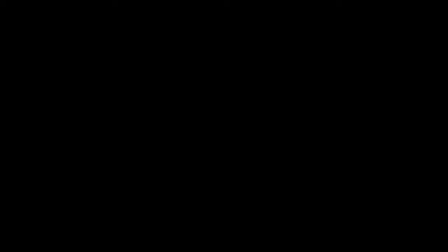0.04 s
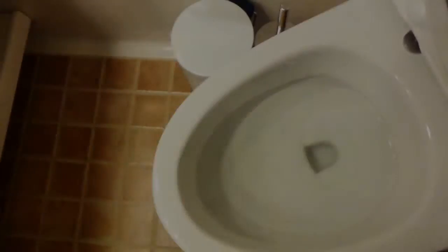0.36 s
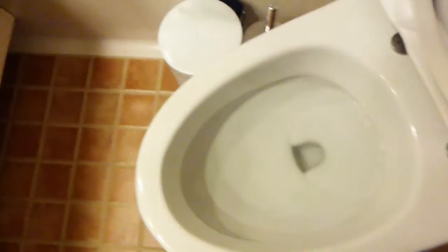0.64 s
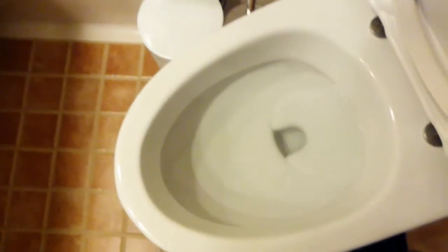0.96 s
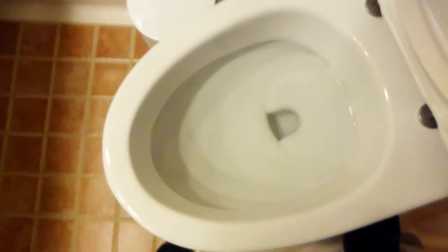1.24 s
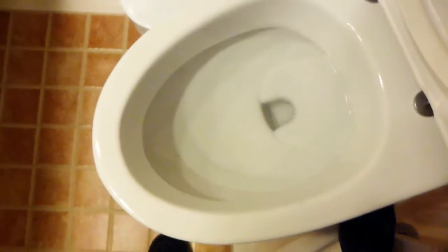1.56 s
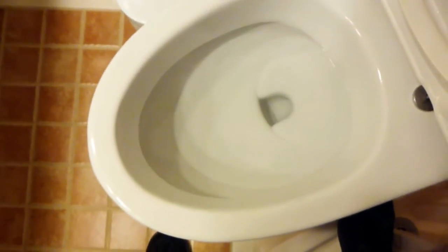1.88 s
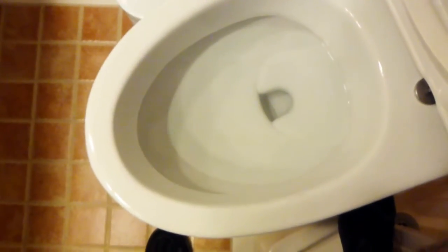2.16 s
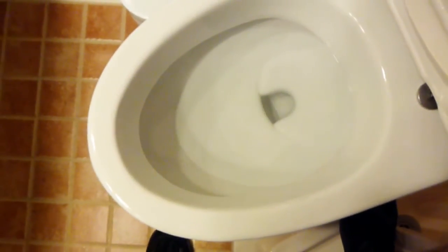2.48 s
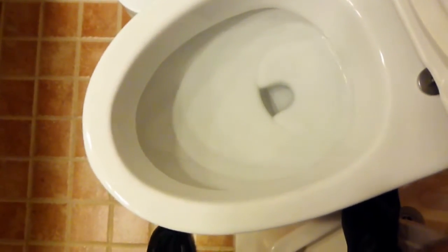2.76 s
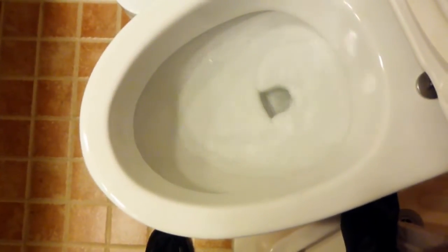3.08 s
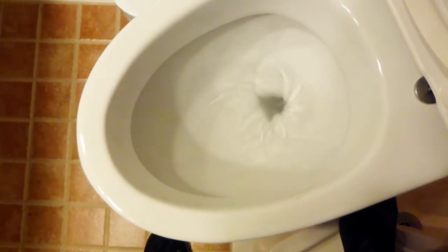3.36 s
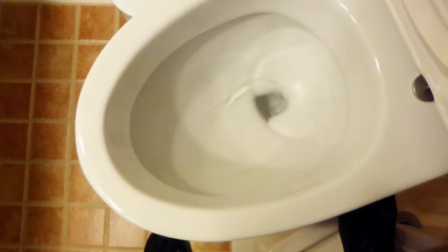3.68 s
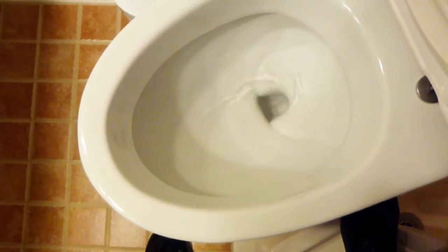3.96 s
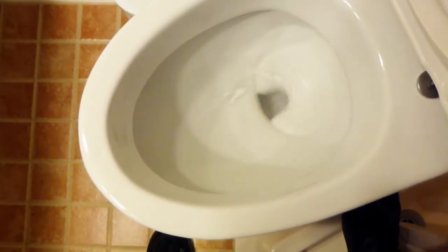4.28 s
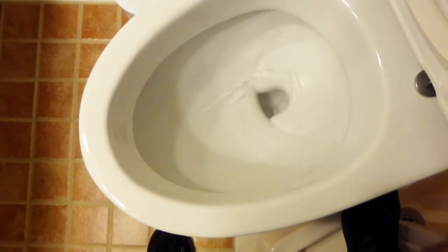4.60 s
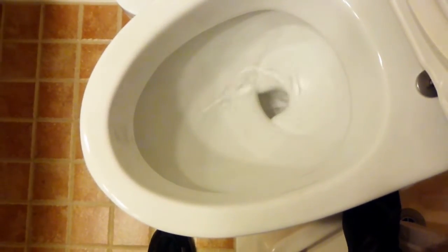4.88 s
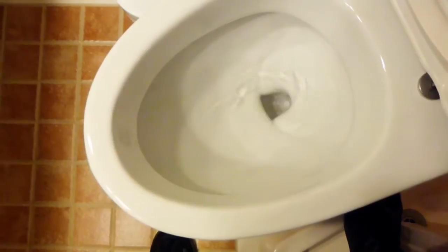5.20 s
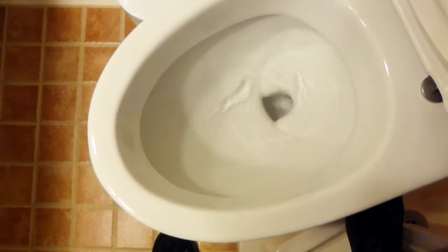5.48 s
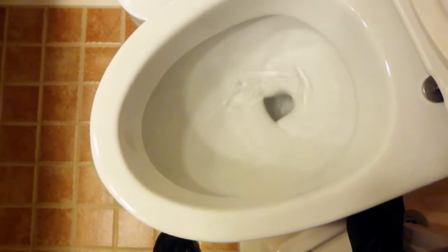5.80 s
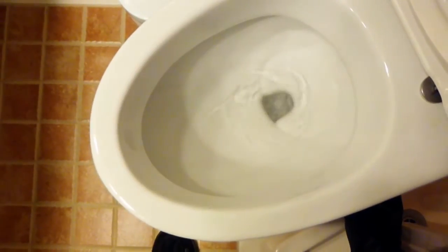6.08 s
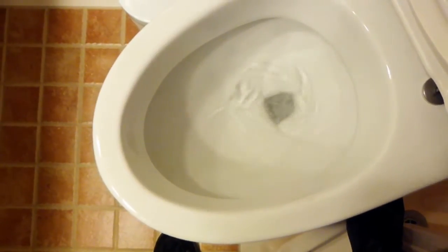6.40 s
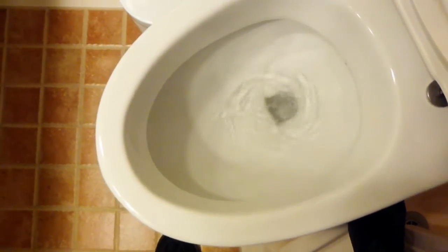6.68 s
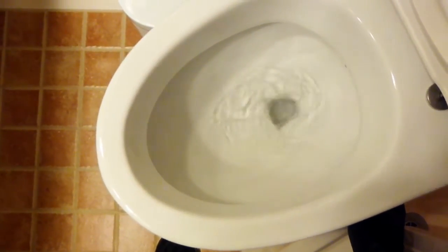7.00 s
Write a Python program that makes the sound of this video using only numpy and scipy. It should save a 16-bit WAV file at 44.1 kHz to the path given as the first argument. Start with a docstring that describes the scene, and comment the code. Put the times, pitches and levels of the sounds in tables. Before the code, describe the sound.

Heard close above the bowl in a cramped cubicle, a vacuum toilet flushes over a low, steady ventilation hum. Soft taps and a button click lead into gurgling, spraying suction, which grows into a loud, droning rush of air. A hard, briefly ringing thump cuts it off. Afterwards, much quieter water patters and trickles back into the bowl with small bubbling drops and sharp spits.

```python
"""Vacuum toilet flush

A vent hums in a small cubicle. The button clicks, the drain valve thuds open, and the water is
slurped out in spitting gulps. Air then roars down the empty pipe until the valve slams shut.
A limiter briefly turns everything down at the slam, and rinse jets patter and drip into the bowl."""
import sys
import numpy as np
from scipy import signal
from scipy.fft import rfft, irfft, next_fast_len
from scipy.io import wavfile
from scipy.ndimage import uniform_filter1d, minimum_filter1d, map_coordinates

SR = 44100
rng = np.random.default_rng(int(sys.argv[2]) if len(sys.argv) > 2 else 0)


def unload_audio(sound):
    """Save the sound as a 16-bit wav file, at the path given as the first command line argument."""
    columns = np.transpose(np.atleast_2d(sound))
    # keep every value between -1 and 1, then stretch to whole-number steps
    steps = np.round(np.clip(columns, -1, 1) * 32767)
    wavfile.write(sys.argv[1], SR, steps.astype(np.int16))


N = 319725
T = np.arange(N) / SR

# The broad tone of each sound, from bass to treble: (frequency [Hz], relative level [dB])
VENT_TONE = [(12, -18), (20, -24), (49, -13), (134, -11.5), (172, -0.5), (277, -16.5), (377, -13.5),
             (410, -18.5), (513, -21), (558, -24.5), (624, -18.5), (698, -23.5), (1370, -26.5),
             (1610, -25.5), (16000, -50)]  # air in the duct
PLASTIC_TONE = [(100, -6), (400, 5.5), (1100, -9), (1600, 1.5), (2100, -4), (3000, -8.5), (5000, -22),
                (10000, -23), (15500, -30)]  # knocks on plastic
PUFF_TONE = [(800, -3.5), (2000, -13), (4500, 3), (6500, -0.5), (9000, -7.5), (15500, -9.5)]  # the button's puff, and mist in the pipe
WASH_TONE = [(40, -16), (100, -21.5), (160, -1.5), (250, -6), (295, -6), (345, 0), (420, -7.5), (520, -17),
             (900, -24.5), (1500, -62), (4000, -31)]  # rinse water drumming on the bowl
JET_TONE = [(500, 2), (1500, -24), (3000, 8), (6000, 5.5), (7600, -1.5), (10000, -7.5), (13000, 4),
            (15500, -0.5)]  # hissing rinse jets
SPIT_TONE = [(1000, -48), (3500, 7), (5500, 3), (7600, 8.5), (10000, 4.5), (15500, -6.5)]  # spitting nozzles
THUD_TONE = [(30, -22), (80, -19.5), (170, 5), (450, 6.5), (1200, 0.5), (3000, -3), (12000, -34)]  # what the bowl lets out of the pipe's ring
SPRAY_TONE = [(40, -13), (120, -6), (350, -3), (700, -12.5), (1500, -17), (2400, -8), (3400, -8),
              (5000, -6.5), (8000, -7.5), (11000, -11), (15500, -17.5)]  # water tearing at the outlet
GULP_TONE = [(80, -23), (300, -5.5), (550, -8), (1100, 1), (2000, -5.5), (3300, 3.5), (4300, 0.5),
             (5300, -4), (7000, -6), (10000, -13.5), (15500, -27)]  # gulps of water and air
DRONE_TONE = [(30, -29), (95, -18), (135, -5), (200, -7), (250, 2.5), (300, 2.5), (335, -18.5), (400, -5),
              (520, -17.5), (900, -41.5)]  # air in the pipe
ROAR_TONE = [(150, -19.5), (450, -17.5), (700, -4), (900, 1.5), (1100, 0.5), (1400, -5.5), (2100, -9),
             (3200, -13.5), (4500, -16.5), (6000, -21), (10000, -23.5), (15500, -35)]  # air in the bowl

# Resonances (pitches that ring) and the dips between them: (frequency [Hz], width [Hz], boost [dB])
DUCT_PEAKS = [(49, 21, 9.5), (123, 4.3, 11), (163.5, 30, 7), (280, 40, -6), (313, 35, 6), (380, 14, 8),
              (518, 14, 7.5), (1583, 9.6, 12)]  # the vent's hum
BUTTON_PEAKS = [(1590, 200, 7), (2210, 290, 8)]  # the button's ring
BOWL_PEAKS = [(163.6, 14, 14.5), (339.8, 33.5, 9), (590.6, 67, 12), (652.6, 25, 7.5), (780, 31, 4),
              (768, 25, -6), (864, 72, 9), (1185, 20, 11), (1295, 75, -6), (1344, 14, 6.5), (1532, 5.9, 11),
              (1590, 99, 0.5), (1720, 35, 6.5), (1984, 39, -13), (1954, 80, 15), (2163, 41, 4),
              (2475, 22, 9.5), (2580, 70, -1.5), (2821, 46, 8.5), (3066, 34, 10), (3330, 19, 1.5),
              (3880, 17, 4), (4740, 10, -2)]  # the bowl and cubicle
EMPTY_BOWL_PEAKS = [(555, 25, -5), (845, 40, 3), (1270, 70, -5), (1438, 20, 4), (1567, 30, 4),
                    (1737, 28, 4), (2030, 90, -4), (2403, 24, 4), (2630, 60, -4), (3337, 18, 5),
                    (4813, 22, 6)]  # the sharper ring that an empty bowl adds

# The cubicle's echo: (frequency [Hz], time to fade by 60 dB [s])
ECHO_TIMES = [(150, 0.022), (1000, 0.058), (4000, 0.07), (12000, 0.22)]
# How much of the echo differs between the ears: (frequency [Hz], level [dB])
STEREO_WIDTH = [(50, -23), (90, -27), (170, -36), (400, -30), (1200, -25), (3500, -19.5), (10000, -16)]
# Light knocks and the button: (time [s], relative level [dB], fade time [s], tilt [dB per octave])
BUTTON_KNOCKS = [(1.8, -37.5, 0.012, -6), (2.254, -28, 0.012, -10), (2.777, -31, 0.012, -7),
                 (2.846, -35.5, 0.025, -1), (2.88, -25, 0.015, 2.5), (2.904, -33, 0.073, -15.5)]
# The stronger spits from the rinse nozzles: (time [s], relative level [dB])
STRONG_SPITS = [(5.714, -25), (5.902, -34), (6.062, -28), (6.106, -30), (6.345, -31), (6.404, -31),
                (6.494, -24), (6.621, -25), (6.71, -28.5), (6.779, -26), (6.905, -28.5), (6.995, -24),
                (7.008, -13.5), (7.232, -25.5)]
# Large drops that trap a bubble: (time [s], relative level [dB], bubble pitch [Hz])
BIG_DROPS = [(5.297, -29, 1650), (5.514, -40.5, 3370), (5.618, -35, 1350), (5.728, -38.5, 3150),
             (5.812, -33.5, 1165), (5.822, -35, 1480), (6.019, -36, 1335), (6.057, -32, 4560),
             (6.15, -41.5, 1940), (6.306, -35, 1437), (6.334, -27, 1195), (6.343, -19.5, 2966),
             (6.456, -30.5, 3810), (6.467, -33, 1102), (6.493, -32, 1870), (6.511, -29.5, 1540),
             (6.535, -25.5, 4600), (6.774, -31.5, 2960), (6.9, -36, 1536), (7.008, -35, 1920),
             (7.007, -30, 4040), (7.063, -28.5, 2540)]
# The drain valve opens, rebounds and slams shut: (time [s], relative level [dB])
VALVE_STROKES = [(3.104, -26), (3.157, -38), (5.087, -2), (5.097, -4)]
# The notes of the jolted pipe: (frequency [Hz], relative level [dB], time to fade by 60 dB [s])
PIPE_NOTES = [(158.2, 7, 0.18), (249.8, 8.5, 0.35), (338.3, -3.5, 0.18), (581, -14.5, 0.14),
              (649, -13.5, 0.19), (827, -14.5, 0.15), (1023, -9.5, 0.093), (1137, -12.5, 0.2),
              (1924, -15, 0.14)]
# Gulps of water and air:
# (peak time [s], relative level [dB], rise time [s], tilt [dB per octave], air pocket pitch [Hz])
WATER_GULPS = [(3.106, -27, 0.0016, 0, 3710), (3.12, -21, 0.009, -12.5, 216),
               (3.165, -22.5, 0.0099, -9, 110), (3.174, -24.5, 0.0054, -6.5, 1820),
               (3.249, -18.5, 0.0025, -6.5, 464), (3.285, -16, 0.018, -3, 3900),
               (3.338, -20.5, 0.013, -5, 2910), (3.42, -14.5, .01, -5.5, 565),
               (3.434, -13.7, .011, 1, 3530), (3.472, -17.5, .014, .5, 5000),
               (3.554, -18.3, .0087, 2, 3250), (3.585, -18, 0.031, 0.5, 6350),
               (3.632, -20, 0.023, 1.5, 1240), (3.699, -15, 0.014, -0.5, 1210),
               (3.828, -18.7, 0.012, -3.5, 830), (3.877, -16, 0.0012, -4.5, 1120),
               (3.889, -19.5, 0.0066, -2, 590), (3.919, -11.5, 0.0011, -1, 1730),
               (3.947, -14.5, 0.0044, -1.5, 2400), (3.974, -11, 0.0089, -2.5, 970),
               (4.003, -17, 0.0066, -5, 1170), (4.07, -20.5, 0.021, -4.5, 204),
               (4.182, -19.5, 0.015, -4.5, 910), (4.304, -14.5, 0.017, -7, 263.3),
               (5.053, -13, .0014, -8, 590)]
# The last sheets of water, torn into mist by the air: (start [s], end [s], level [dB])
MIST_BURSTS = [(3.978, 4.18, -40.5), (4.202, 4.405, -37), (4.666, 4.925, -31.5), (4.91, 5.08, -35)]

# The valve opens, air breaks into the outlet, the bowl is empty, the valve shuts, the rinse starts.
OPEN_S, BREAK_S, EMPTY_S, SHUT_S, RINSE_S = 3.104, 3.24, 3.96, 5.087, 5.17


def amp(db):
    """Turn decibels into a number to multiply by."""
    return 10 ** (np.asarray(db) / 20)


def unit(x):
    """Scale a sound to an average power of 1."""
    return x / np.sqrt(np.mean(x ** 2) + 1e-20)


def along(points, hz):
    """Read between (frequency, value) points, with octaves evenly spaced."""
    freqs, values = np.transpose(points)
    return np.interp(np.log(hz + 1), np.log(freqs + 1), values)


def wobble(rate):
    """A smooth curve through `rate` random values a second."""
    return map_coordinates(rng.standard_normal(int(N * rate / SR) + 4), [T * rate])


def envelope(start, attack, end=np.inf, release_db=0, grow_db=0):
    """Fade in over `attack` seconds; gain grow_db a second until `end`, then lose release_db a second."""
    held = np.clip(T, start, end) - start
    fade_in = np.clip((T - start) / attack, 0, 1)
    return fade_in * amp(grow_db * held - release_db * np.maximum(T - end, 0))


def colour(x, tone, peaks=(), tilt_db=0):
    """Filter a sound with a broad tone, resonances, and a tilt per octave above 300 Hz."""
    size = 2 * next_fast_len(len(x) // 2 + SR // 8, real=True)
    hz = np.fft.rfftfreq(size, 1 / SR)
    db = along(tone, hz) + tilt_db * np.log2(np.maximum(hz, 300) / 300)
    db = db + sum(boost / (1 + (2 * (hz - f) / width) ** 2) for f, width, boost in peaks)
    # these steps make the filter ring after each hit, never before it
    cepstrum = irfft(np.log(unit(amp(db))))
    cepstrum[1:size // 2] *= 2
    cepstrum[size // 2 + 1:] = 0
    return irfft(rfft(x, size) * np.exp(rfft(cepstrum)), size)[:len(x)]


def add(track, s, sound):
    """Mix a sound into the track at `s` seconds."""
    part = track[max(round(s * SR), 0):][:len(sound)]
    part += sound[:len(part)]


def burst(t, fall):
    """Noise that dies away, to about a third every `fall` seconds."""
    return rng.standard_normal(len(t)) * np.exp(-t / fall)


def patter(rate, spread_db):
    """Tiny random impacts of uneven size, about `rate` a second."""
    size = amp(spread_db * np.clip(rng.standard_normal(N), -2, 2))
    return unit((rng.random(N) < rate / SR) * size * rng.standard_normal(N))


def bubble(hz, cycles, glide=0.02):
    """A trapped bubble rings briefly, its pitch rising a little."""
    t = T[:SR // 16]
    age = t * hz / cycles
    phase = 2 * np.pi * np.cumsum(hz * (1 + glide * np.tanh(age / 2))) / SR
    return np.sin(phase) * np.exp(-age) * (1 - np.exp(-t * hz))


def room(x, wet_db):
    """Blend in the short, dense echo off the cubicle's walls; a higher wet_db gives more echo."""
    hz, t, spectrum = signal.stft(rng.standard_normal(SR // 3), SR, nperseg=256)
    decay = amp(-60 * t / along(ECHO_TIMES, hz)[:, None])
    tail = signal.istft(spectrum * decay, SR, nperseg=256)[1]
    echo = signal.fftconvolve(x, np.pad(tail, (SR // 400, 0)) / np.linalg.norm(tail))[:N]
    return (x + amp(wet_db) * echo) / np.hypot(1, amp(wet_db))


def ventilation():
    """Steady air hums in the duct."""
    return amp(-40) * unit(colour(rng.standard_normal(N), VENT_TONE, DUCT_PEAKS))


def button():
    """Knocks on plastic, then a short puff of air from the button's control valve."""
    out, t = np.zeros(N), T[:SR // 4]
    for s, db, fall, tilt_db in BUTTON_KNOCKS:
        add(out, s, amp(db) * colour(burst(t, fall), PLASTIC_TONE, BOWL_PEAKS + BUTTON_PEAKS, tilt_db))
    puff_level = amp(-39) * envelope(start=2.872, attack=0.021, end=2.93, release_db=496)
    return out + puff_level * unit(colour(rng.standard_normal(N), PUFF_TONE))


def drips(small_bubbles=7):
    """Each drop slaps the pool, traps one main bubble and scatters weaker ones."""
    out, t = np.zeros(N), T[:SR // 20]
    for s, db, hz in BIG_DROPS:
        slap = colour(burst(t, fall=0.0096), [(hz / 3, -25), (hz, 0), (hz * 3, -22)])
        add(out, s, amp(db + 3.5) * bubble(hz, cycles=11))
        add(out, s, amp(db - 9) * slap)
        for delay, pitch, weakness in rng.random((small_bubbles, 3)):
            level = amp(db - 0.5 - 10 * weakness - 9 * delay)
            add(out, s + 0.054 * delay, level * bubble(hz * 2 ** (pitch - .5), cycles=3.6))
    # drops land near the rim, so the bowl rings only faintly
    faint_peaks = [(hz, width, boost / 2) for hz, width, boost in BOWL_PEAKS]
    return room(colour(out, [(300, 0.011), (5000, 0)], faint_peaks), wet_db=-2)


def froth(low_hz, high_hz, count):
    """A swarm of small bubbles rings at random moments while the rinse runs."""
    out = np.zeros(N)
    for when, pitch, weakness in rng.random((count, 3)):
        hz = low_hz * (high_hz / low_hz) ** pitch
        s = RINSE_S + when * (T[-1] - RINSE_S)
        add(out, s, amp(-14 * np.sqrt(weakness)) * bubble(hz, cycles=4))
    return out / np.std(out[T > RINSE_S])


def spits(weak_count=14):
    """The nozzles spit sharply, with weaker spits at random once the rinse is at full pressure."""
    out, t = np.zeros(N), T[:SR // 20]
    start = RINSE_S + 0.25
    weak_spits = [(start + when * (T[-1] - start), -29.5 - 10.5 * weakness)
                  for when, weakness in rng.random((weak_count, 2))]
    for s, db in STRONG_SPITS + weak_spits:
        squeak = [(rng.uniform(7000, 14000), 2500, 6)]  # each spit has its own brightness
        add(out, s, amp(db - 7.5) * colour(burst(t, fall=0.004), SPIT_TONE, squeak))
    return out


def rinse(covered_s=6.45):
    """Thin jets drum on the bowl, hiss, fizz and spit; the churning eases once the pool is covered."""
    flow = envelope(RINSE_S, attack=0.14, grow_db=0.72)
    wash = amp(-37) * flow * unit(colour(rng.standard_normal(N), WASH_TONE, BOWL_PEAKS))
    droplets = amp(6.5 * wobble(45)) * patter(rate=4300, spread_db=6)
    hiss = amp(-2.5) * unit(colour(droplets, JET_TONE, BOWL_PEAKS))
    fizz = amp(-4) * froth(low_hz=8000, high_hz=15000, count=260)
    jets = amp(-52) * flow * (hiss + fizz)
    churn_level = amp(-49.5) * envelope(RINSE_S, attack=0.72, end=covered_s, release_db=19)
    bubbles = froth(low_hz=750, high_hz=4800, count=520)
    pool = churn_level * colour(bubbles, [(300, 0), (5000, 0)], BOWL_PEAKS)
    return wash + room(jets + pool + spits(), wet_db=-0.5)


def valve():
    """Each stroke of the drain valve sends a jolt of pressure ringing through the pipe."""
    out, t = np.zeros(N), T[:SR // 2]
    ring = sum(amp(db) * np.sin(2 * np.pi * hz * t) * np.exp(-np.log(1000) * t / ring_s)
               for hz, db, ring_s in PIPE_NOTES)
    thud = colour(ring, THUD_TONE)
    for s, db in VALVE_STROKES:
        add(out, s, amp(db + 10.5) * thud / np.abs(thud).max())
    return out


def gurgle(start_hz=237.3, first_octave_s=.155, width_hz=240):
    """The column of water in the outlet rings with a rough note that climbs ever faster as it shortens."""
    octaves = np.clip((T - OPEN_S) / first_octave_s, 0, 1.4) ** 2
    phase = 2 * np.pi * np.cumsum(start_hz * 2 ** octaves) / SR
    level = amp(-28 + 3 * wobble(45))
    level *= envelope(OPEN_S, attack=.012, end=3.28, release_db=195, grow_db=-26)
    rough_note = wobble(width_hz) * np.cos(phase) + wobble(width_hz) * np.sin(phase)
    return level * unit(rough_note)


def spray():
    """Water seeps faintly while it covers the outlet, then tears into spray as air breaks in."""
    seep = amp(-52.5) * envelope(OPEN_S, attack=.01, end=BREAK_S, release_db=302.5)
    full_flow = amp(-30) * envelope(BREAK_S, attack=0.033, end=EMPTY_S, release_db=400, grow_db=4.5)
    level = (seep + full_flow) * amp(2 * wobble(60))
    return level * unit(colour(patter(rate=13000, spread_db=-4.5), SPRAY_TONE, BOWL_PEAKS))


def gulps(first_fall_s=0.022, last_fall_s=0.0063, shrink_s=1.2):
    """Lumps of water go down as crackling gulps, each ringing its own pocket of air."""
    out, t = np.zeros(N), T[:SR // 3] - .1  # t is zero at the gulp's peak
    for s, db, rise, tilt_db, pocket_hz in WATER_GULPS:
        # gulps die faster as the bowl empties
        fall = max(first_fall_s * np.exp((OPEN_S - s) / shrink_s), last_fall_s)
        swell = np.exp(np.minimum(t / rise, -t / fall))
        roughness = unit(uniform_filter1d(rng.standard_normal(len(t)), size=60))
        tearing = unit(amp(1.5 * roughness) * rng.standard_normal(len(t)))
        boost_db = 9 + 20.5 * np.exp(-pocket_hz / 160)  # big, low pockets ring hardest
        pocket = [(pocket_hz, 60 + 0.12 * pocket_hz, boost_db)]
        add(out, s + t[0], amp(db) * colour(swell * tearing, GULP_TONE, BOWL_PEAKS + pocket, tilt_db))
    return out


def airflow(lead_s=0.11, choke_s=0.019):
    """Swirling air drones in the pipe and roars in the bowl; the last water flutters and sizzles in it."""
    start, end = EMPTY_S - lead_s, SHUT_S + choke_s
    surge = amp(4.5 * np.exp(-np.abs(T - SHUT_S) / .028))  # the closing valve squeezes the air
    drone_level = amp(-24 + wobble(13)) * surge
    drone_level *= envelope(start, attack=0.27, end=SHUT_S, release_db=298, grow_db=3.5)
    roar_level = amp(-22) * surge * envelope(start, attack=0.13, end=end, release_db=472, grow_db=2)
    mist_level = sum(amp(db) * envelope(s, attack=0.071, end=until, release_db=300)
                     for s, until, db in MIST_BURSTS)
    flutter = amp(2.2 * wobble(25) + 2.1 * wobble(260))
    drone = drone_level * unit(colour(rng.standard_normal(N), DRONE_TONE, BOWL_PEAKS))
    sizzle = mist_level * unit(colour(patter(rate=4800, spread_db=0.5), PUFF_TONE, BOWL_PEAKS))
    swirl = flutter * rng.standard_normal(N)
    roar = roar_level * unit(colour(swirl, ROAR_TONE, BOWL_PEAKS + EMPTY_BOWL_PEAKS))
    return drone + room(sizzle + roar, wet_db=-6.5)


def scene():
    """Mix it all; only the wall echoes of the air and water differ between the ears."""
    rushing = spray() + gulps() + gurgle() + airflow() + rinse() + drips()
    middle = ventilation() + button() + valve() + rushing
    echo_spectrum = rfft(room(rushing, wet_db=31))
    width = amp(along(STEREO_WIDTH, np.fft.rfftfreq(N, 1 / SR)))
    side = irfft(echo_spectrum * width, N)
    return np.array([middle + side, middle - side])


def limiter(x, ceiling_db, hold_s, release_db):
    """Peaks over the ceiling turn the volume down; it waits, then climbs back by release_db a second."""
    over_db = np.maximum(20 * np.log10(np.abs(x).max(axis=0) + 1e-9) - ceiling_db, 0)
    half = int(hold_s * SR / 2)
    held_db = -minimum_filter1d(-over_db, 2 * half + 1, origin=half)
    cut_db = np.maximum.accumulate(held_db + release_db * T) - release_db * T
    # looking a little ahead lets the volume fall smoothly before the peak
    return x * uniform_filter1d(minimum_filter1d(amp(-cut_db), size=221), size=221)


def record(dry):
    """Fade the sound in, hold down its peaks and cut off the very highest treble."""
    faded = dry * envelope(start=0.097, attack=0.45)
    limited = limiter(faded, ceiling_db=-.15, hold_s=0.19, release_db=35)
    hz = np.fft.rfftfreq(N, 1 / SR)
    return irfft(rfft(limited) * (hz < 15750), N)


dry = scene()
out = record(dry)
unload_audio(out)
```